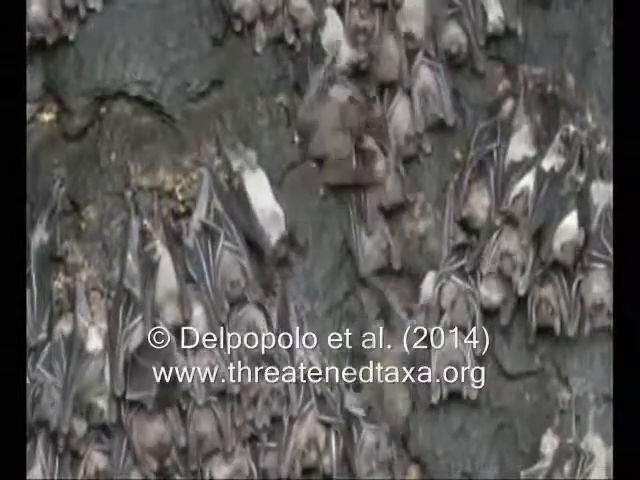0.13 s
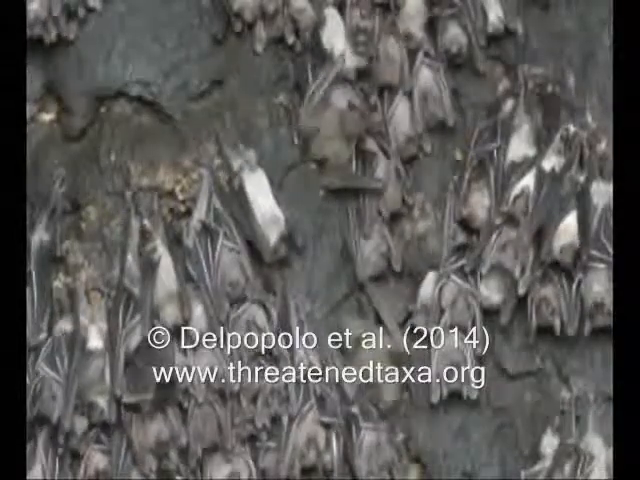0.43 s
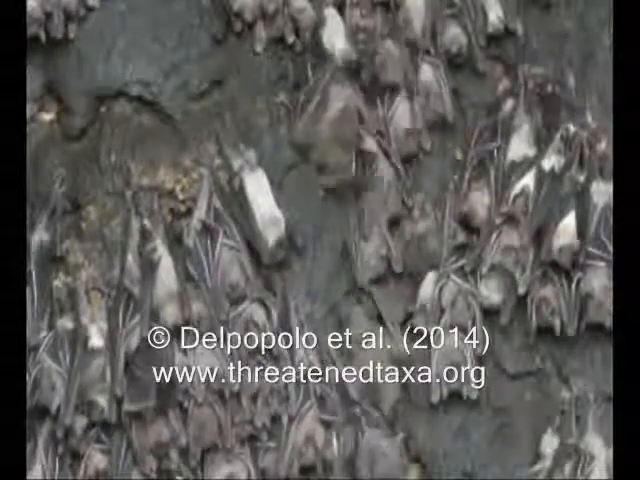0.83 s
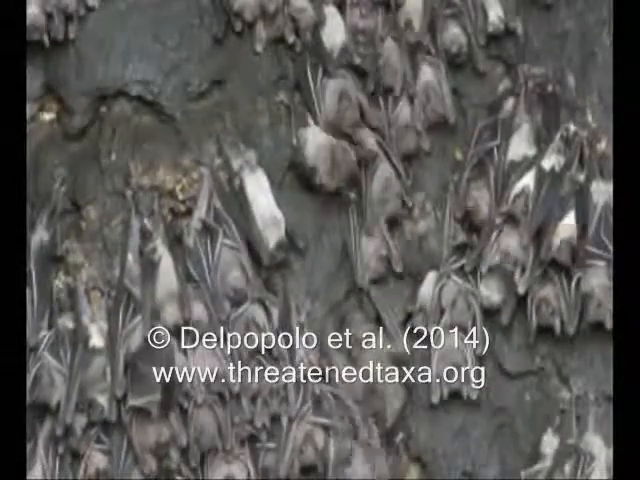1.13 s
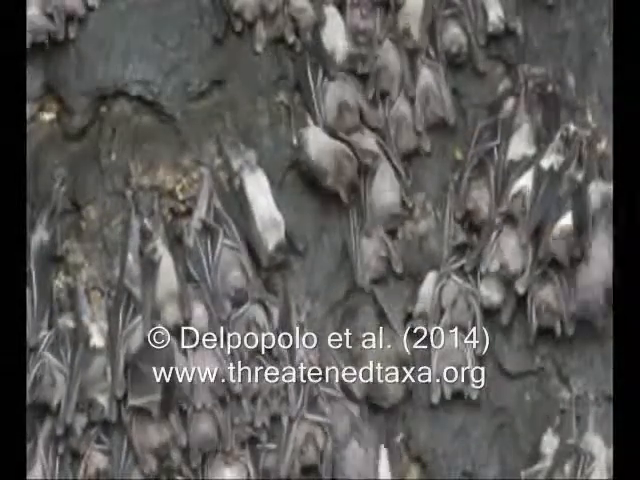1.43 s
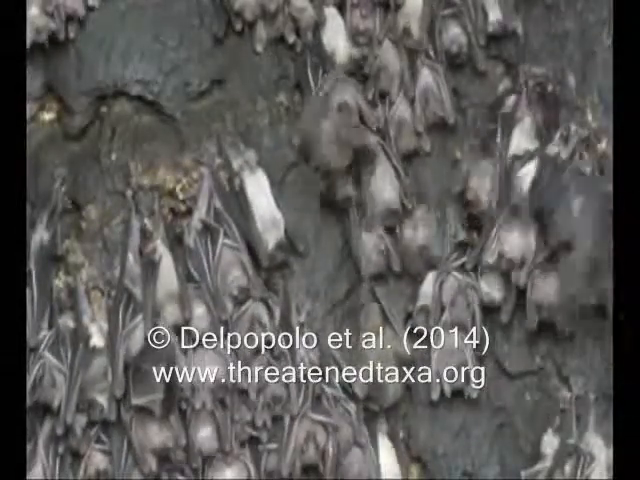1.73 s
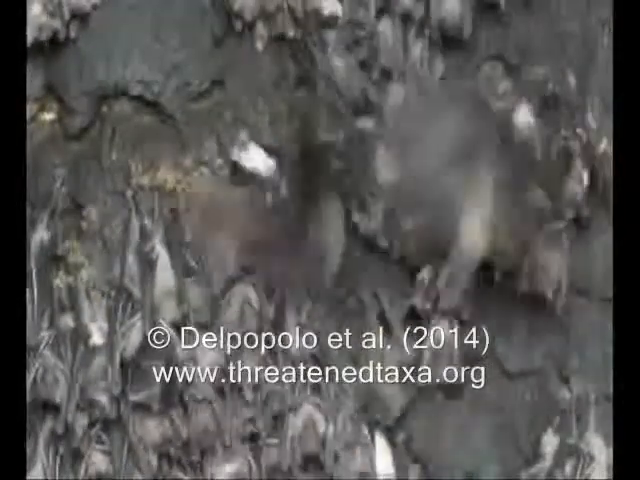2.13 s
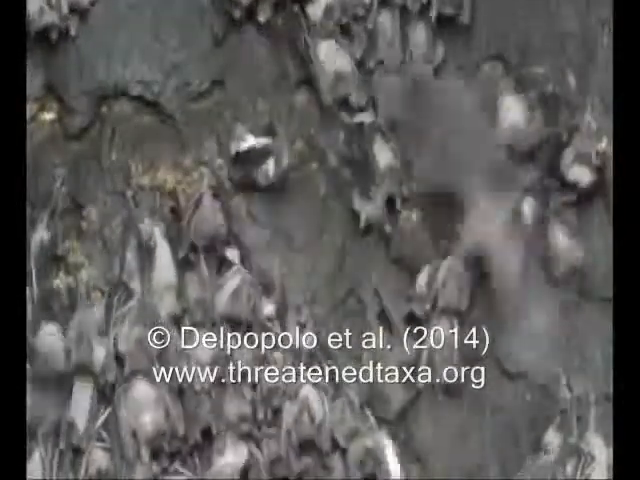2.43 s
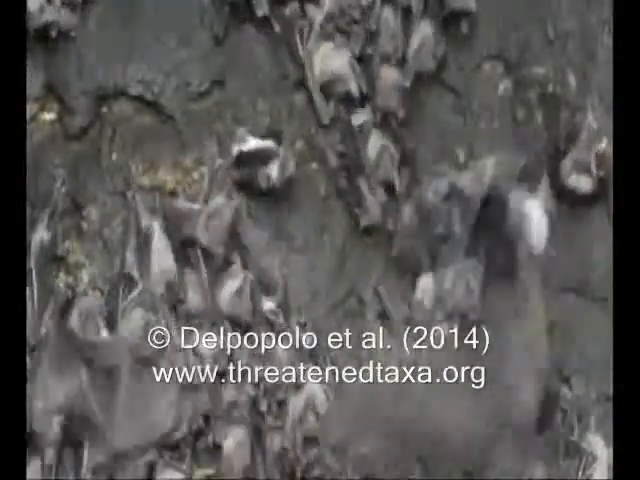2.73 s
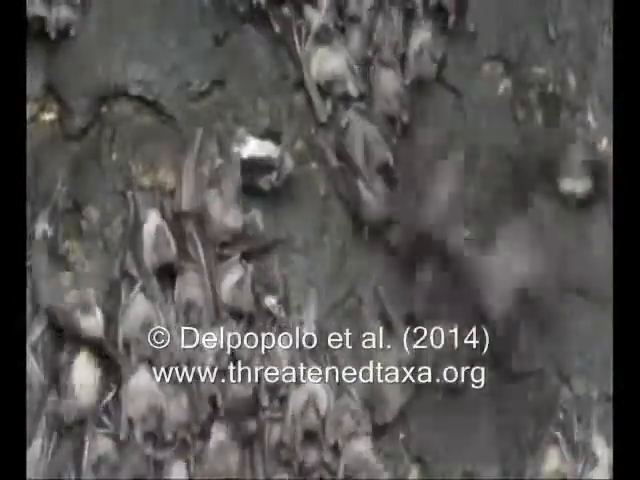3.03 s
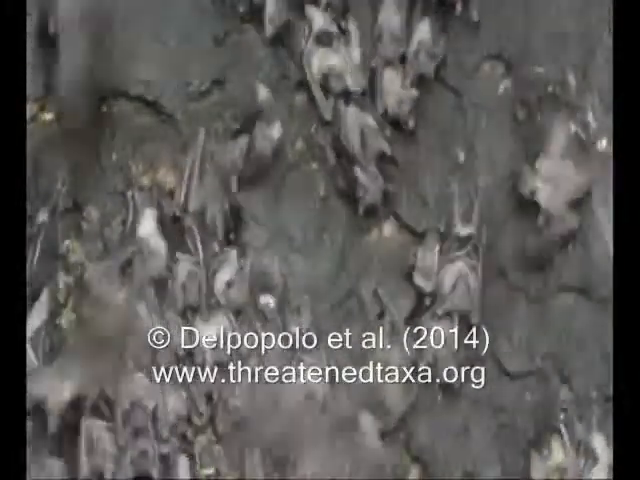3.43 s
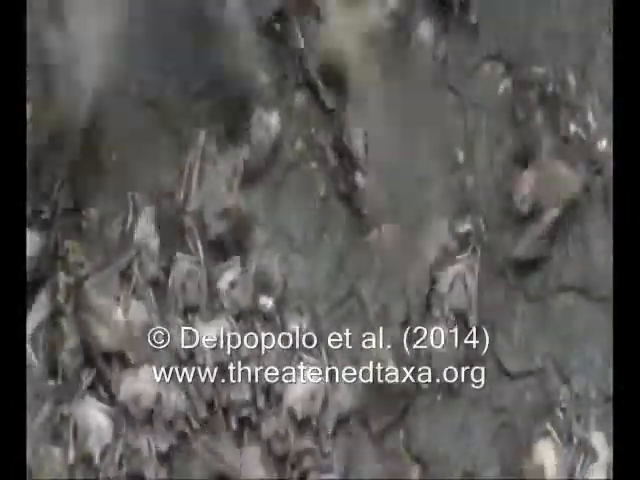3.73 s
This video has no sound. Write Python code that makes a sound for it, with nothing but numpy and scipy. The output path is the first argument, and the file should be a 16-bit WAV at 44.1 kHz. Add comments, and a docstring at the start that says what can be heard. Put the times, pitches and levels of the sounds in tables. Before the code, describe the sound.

A large bat colony chatters throughout about 4 seconds, merging into a dense, bright, fluttering hiss strongest around 5-7 kHz and leaning right. Faint tiny squeaks flicker inside it. From about 0.3 s nearer, brief rasping screeches emerge; from 0.9 s thin gliding squeaks join, clustered until 1.3 s, then scattered almost to the end. Short cave reflections blur them over a faint, sinking hollow rush and low hum.

```python
"""A large colony of fruit bats in a cave, heard mostly on the right: filtered noise and swept tones.
From the start, far calls merge into a bright, surging hiss, with faint random squeaks among them;
a noise rush with a slowly sinking hollow resonance and a hum of wavering tones lie underneath.
Nearer screeches (rasping noise bands) enter after about 0.3 s, thin gliding squeaks (swept sines)
before 0.9 s; both recur almost to the end, smeared like the faint squeaks by reflections off rock."""
import sys
import numpy as np
from scipy import signal
from scipy.fft import rfft, irfft
from scipy.io import wavfile

SR = 44100
rng = np.random.default_rng(int(sys.argv[2]) if len(sys.argv) > 2 else 0)


def dump(signal):
    """Clip the signal to [-1, 1] and save it as 16-bit WAV at the path in sys.argv[1]."""
    limited = np.clip(np.atleast_2d(signal).T, -1, 1)
    pcm = np.round(limited * 32767).astype(np.int16)
    wavfile.write(sys.argv[1], SR, pcm)


N = 171990
TIME = np.arange(N) / SR   # s

# Relative spectral density of the merged far calls: f/Hz, level/dB per Hz
COLONY_SPECTRUM = [(1300, -27), (1470, -22), (1600, -23.5), (1800, -18.5), (2300, -18), (3350, -12.5),
                   (4300, -5), (4900, -0.5), (6100, 1), (7000, 0.46), (8600, -4.5), (10300, -4),
                   (11400, -5), (12300, -8.5)]
# Level curves of the lower and upper voices, used about their means and scaled: t/s, level/dB
LOW_VOICE_LEVEL = [(0.0, -18), (0.15, -20), (1.05, -22), (1.07, -26), (1.12, -21), (1.9, -23),
                   (1.93, -19.5), (2.36, -24.5), (3.08, -17.5), (3.15, -24), (3.31, -18.5), (3.37, -23),
                   (3.48, -23), (3.58, -23), (3.64, -19), (3.73, -23), (3.88, -17.5), (3.9, -27)]
HIGH_VOICE_LEVEL = [(0.0, -19), (0.02, -20.5), (0.57, -20.5), (0.66, -23), (0.75, -17), (0.79, -22),
                    (1.02, -22), (1.1, -24.5), (1.25, -20.5), (1.34, -22.5), (1.53, -19.5), (1.64, -24.5),
                    (1.68, -21), (2.73, -20.5), (2.76, -23), (3.16, -20), (3.2, -21.5), (3.9, -22)]
# Nearer screeches, level before a common trim:
# middle t/s, duration/s, centre f/Hz, bandwidth/Hz, level/dB, left minus right/dB
SCREECH_CALLS = [ (0.372, 0.17, 6860, 1200, -23, -7), (0.551, 0.091, 6950, 1300, -19.5, -9),
                 (0.741, 0.088, 7050, 1700, -29, -8), (0.75, 0.058, 9150, 1300, -28, -4),
                 (0.914, 0.073, 10800, 1500, -24, -17), (1.023, 0.077, 7200, 900, -23, -6),
                 (1.423, 0.062, 9100, 1200, -24, -3), (1.537, 0.044, 10200, 2200, -22, -12),
                 (1.909, 0.1, 10600, 1100, -24, -16), (2.155, 0.067, 8700, 1900, -25, 1),
                 (2.387, .048, 10000, 1100, -26, -12), (2.511, 0.059, 11800, 1000, -21, -17),
                 (2.695, 0.054, 8400, 1500, -23, -5), (2.79, 0.12, 5130, 800, -24.5, -11),
                 (2.96, .16, 5950, 900, -24.5, -7), (3.15, .06, 6200, 1300, -24, -10),
                 (3.255, 0.1, 5200, 700, -22.5, -6), (3.424, 0.052, 5230, 700, -23, -6),
                 (3.624, 0.11, 11900, 1100, -27, -12), (3.629, .11, 6560, 1700, -20, -10),
                 (3.881, .04, 8300, 2200, -17.5, -11)]
# Nearer squeaks, level before taper and common trim:
# start t/s, duration/s, first f/Hz, middle f/Hz, last f/Hz, level/dB, left minus right/dB
SQUEAK_CALLS = [(0.872, 0.023, 9400, 10050, 10400, -20.5, -17), (0.902, .026, 9200, 10000, 10800, -25, -12),
                (0.922, 0.036, 10700, 10000, 8560, -22, -9), (0.93, 0.022, 4450, 4520, 4360, -24, -20),
                (0.952, 0.019, 7630, 7300, 6740, -21.5, -4), (0.988, 0.032, 7300, 7700, 7450, -23, -5),
                (0.999, 0.031, 10500, 11100, 10570, -18.5, -22),
                (1.136, 0.082, 5670, 5950, 6200, -23.5, -8), (1.23, 0.017, 8000, 8300, 8500, -21, -10),
                (1.24, 0.033, 10200, 10150, 10460, -17.5, -14),
                (1.266, 0.046, 10300, 10950, 11130, -21.5, -21),
                (1.374, .022, 11700, 11850, 11600, -24, -18), (1.408, 0.03, 9400, 9100, 8340, -27, -2),
                (1.645, 0.08, 10500, 10650, 10950, -27, -13), (1.71, 0.03, 7270, 7750, 7940, -23, -7),
                (1.717, 0.018, 10900, 10800, 10700, -22, -18),
                (1.758, 0.037, 10300, 10450, 10700, -22, -18),
                (1.902, .03, 11100, 10750, 10000, -23.5, -16), (2.167, 0.044, 7640, 8450, 7900, -22, -5),
                (2.2, .038, 10350, 10400, 10300, -25, -14), (2.262, 0.049, 8300, 8600, 8200, -23.5, -4),
                (2.363, 0.037, 10300, 10500, 10000, -23, -14),
                (2.601, 0.049, 9670, 10650, 10700, -23.5, -16), (3.006, 0.097, 3900, 3980, 3980, -36, -4),
                (3.035, .028, 11400, 11250, 11000, -25, -14), (3.092, 0.018, 9900, 10150, 10100, -24.5, -9),
                (3.128, .03, 9100, 9400, 9500, -25, -2), (3.275, 0.088, 4950, 4870, 4900, -24, -9),
                (3.295, 0.093, 3700, 3700, 3780, -32.5, -6), (3.382, 0.025, 11600, 11650, 11400, -24, -26),
                (3.478, 0.054, 8900, 9050, 8500, -21.5, -8), (3.65, 0.025, 10200, 10150, 9900, -23, -9),
                (3.775, 0.033, 9900, 9900, 8900, -22.5, -5)]
# Relative spectral density of the cave's hollow rush: f/Hz, level/dB per Hz
RUSH_SPECTRUM = [(25, -18), (59, -3.5), (87, -0.5), (130, -4.5), (230, -5.5), (330, -8), (490, -9.5),
                 (620, -5.5), (740, -0.5), (840, 0), (1000, -1.5), (1130, -8), (1270, -11), (1400, -7)]
# Level curve of the rush's hollow resonance, used about its mean: t/s, level/dB
HOLLOW_LEVEL = [(0.0, -44), (0.81, -42.5), (1.52, -44.5), (1.57, -45.5), (3.38, -42), (3.73, -44),
                (3.9, -41.5)]
# Faint hum tones: mean f/Hz, level/dB
HUM_TONES = [(103, -66), (195, -64.5), (271, -68.5)]
# Stereo balance against frequency: f/Hz, left minus right/dB
STEREO_LEAN = [(60, 0.5), (120, 0), (260, -1), (420, -5.5), (750, -5), (1300, -2.5), (2000, -5),
               (3000, -5.5), (4900, -10.5), (7000, -10.5), (8700, -5), (9400, -9.5), (11000, -17.5),
               (11600, -14)]
# Correlation of left and right noise: f/Hz, coefficient (1 = alike)
STEREO_LIKENESS = [(30, 0.65), (70, 0.89), (140, 0.74), (300, 0.26), (800, 0.68), (1400, 0.46),
                   (2800, 0.46), (5500, 0.56), (9000, .68), (12000, 0.68)]

COLONY_DB, VOICE_SPLIT_HZ = -16.5, 5400
SWING = 0.66   # scale on the voice level curves
# spread of each random level (its sign is immaterial) and its rate
SURGE_DB, SURGES_PER_S = 0.4, 12   # the whole colony
PATCH_DB, PATCHES_PER_S = 0.97, 37   # each pitch range on its own
FLUTTER_DB, FLUTTERS_PER_S = -0.3, 360   # each pitch range, faster

SCREECH_TRIM_DB, RASP_DB, RASPS_PER_S = -2, 2.5, 520

SQUEAK_TRIM_DB, SQUEAK_TAPER = -2, 0.3   # taper: exponent of the sine envelope
WAVER, WAVERS_PER_S = 0.0093, 250   # spread of pitch, as a share
TREMBLE_DB, TREMBLES_PER_S = 2.5, 120   # spread of level

CHATTER_PER_S, CHATTER_S = 230, 0.026
CHATTER_DB, CHATTER_SPREAD_DB = -32, 4.5   # before the colony's colour and swing
CHATTER_FOLLOWS = 0.5   # share of the colony's colour taken on
CHATTER_LOW_HZ, CHATTER_HIGH_HZ = 4500, 12070
CHATTER_GLIDE, CHATTER_ARCH = 0.11, 0.0299   # shares of the pitch
CHATTER_PAN_DB = 15   # full range about the colony's lean

RUSH_DB = -42.5
RUSH_SINK = 0.034   # the resonance starts this share above its pitch and ends as far below

CAVE_T60_S, CAVE_DB = 0.34, -6
NEAR_WALLS_S, NEAR_WALLS_DB = 0.03, -9.5   # first reflections; level before treble weighting
CUTOFF_HZ = 12450


def colony(count=16):
    """Superposition: many far calls sum to noise, whose bands surge together and flicker separately."""
    hz, noise = diffuse(COLONY_SPECTRUM)
    noise = noise / np.sqrt(1 + (1300 / (hz + 1)) ** 12)   # remove the bass
    low, high = swing_db(LOW_VOICE_LEVEL), swing_db(HIGH_VOICE_LEVEL)
    surge = SURGE_DB * drift(SURGES_PER_S)
    centres = np.linspace(2000, 12500, count)
    out = 0
    for centre, own in zip(centres, np.eye(count)):
        upper = 1 / (1 + (VOICE_SPLIT_HZ / centre) ** 10)
        calling = 1 / (1 + (3000 / centre) ** 4)   # the lowest bands vary least
        db = SWING * (upper * high + (1 - upper) * low) + surge
        db = db + PATCH_DB * drift(PATCHES_PER_S) + FLUTTER_DB * drift(FLUTTERS_PER_S)
        band = irfft(noise * np.interp(hz, centres, own), N)   # overlapping triangular bands
        out = out + from_db(calling * db) * band
    return from_db(COLONY_DB) * rms_one(out)


def screeches():
    """Source and filter: noise of rapidly varying level excites a resonant band, giving a rasp."""
    out = np.zeros((2, N))
    for middle, length, hz, width, db, side_db in SCREECH_CALLS:
        throat = signal.butter(2, [hz - width / 2, hz + width / 2], "band", fs=SR, output="sos")
        rasp = from_db(RASP_DB * drift(RASPS_PER_S, size=SR // 2))
        voice = rms_one(signal.sosfilt(throat, rng.standard_normal(SR // 2) * rasp))
        size = int(length * SR)
        swell = np.sqrt(np.abs(np.sin(np.linspace(0, np.pi, size))))
        call = voice[:size] * swell * from_db(db + SCREECH_TRIM_DB)
        add(out, middle - length / 2, call * pan(side_db))
    return out


def squeaks():
    """Superposition of separate tonal calls from the nearer bats, each with its own time and place."""
    out = np.zeros((2, N))
    for start, length, *pitches_hz, db, side_db in SQUEAK_CALLS:
        add(out, start, squeak(length, pitches_hz) * from_db(db + SQUEAK_TRIM_DB) * pan(side_db))
    return out


def squeak(length, pitches_hz):
    """Frequency modulation: a sine follows a parabola through three pitches, with random waver."""
    u = np.linspace(0, 1, int(length * SR))
    glide_hz = np.polyval(np.polyfit([0, 0.5, 1], pitches_hz, 2), u)
    hz = glide_hz * (1 + WAVER * drift(WAVERS_PER_S, size=SR // 2)[:len(u)])
    tone = np.sin(2 * np.pi * np.cumsum(hz) / SR) * np.sqrt(2)
    tremble = from_db(TREMBLE_DB * drift(TREMBLES_PER_S, size=SR // 4)[:len(u)])
    taper = np.abs(np.sin(np.pi * u)) ** SQUEAK_TAPER
    return rms_one(tremble) * taper * tone


def chatter():
    """Random superposition: squeaks from deeper in the crowd follow the colony's colour and swing."""
    out = np.zeros((2, N))
    draws = rng.random((int(CHATTER_PER_S * N / SR), 6))
    for when, pitch, length, glide, loud, place in draws:
        hz = CHATTER_LOW_HZ + (CHATTER_HIGH_HZ - CHATTER_LOW_HZ) * pitch
        slope = CHATTER_GLIDE * (glide - 0.5)
        pitches_hz = hz * np.array([1 - slope, 1 + CHATTER_ARCH, 1 + slope])
        call = squeak(CHATTER_S * (0.5 + length), pitches_hz)
        db = CHATTER_DB + CHATTER_SPREAD_DB * (2 * loud - 1)
        db = db + CHATTER_FOLLOWS * at_hz(COLONY_SPECTRUM, hz)
        side_db = at_hz(STEREO_LEAN, hz) + CHATTER_PAN_DB * (place - 0.5)
        add(out, when * N / SR, call * from_db(db) * pan(side_db))
    return out * from_db(SWING * swing_db(HIGH_VOICE_LEVEL))


def cave(x):
    """Reverberation: convolution with exponentially decaying noise, independent in each ear."""
    t = TIME[:SR]
    walls = rng.standard_normal((2, SR)) * from_db(-60 * t / CAVE_T60_S) * (t > 0.006)
    walls /= np.sqrt(np.sum(walls ** 2, axis=1, keepdims=True))
    return x + from_db(CAVE_DB) * signal.fftconvolve(x, walls, axes=1)[:, :N]


def rush():
    """Resonance: steady low noise under a slowly sinking hollow band, plus the hum."""
    hz, noise = diffuse(RUSH_SPECTRUM)
    noise = noise / np.sqrt((1 + (hz / 1350) ** 12) * (1 + (22 / (hz + 1)) ** 6))
    bass = 1 / (1 + (hz / 450) ** 4)

    def shifted(ratio):
        """Resonance scaling: the same noise with its spectral peaks moved by a ratio."""
        change_db = at_hz(RUSH_SPECTRUM, hz / ratio) - at_hz(RUSH_SPECTRUM, hz)
        return irfft(noise * (1 - bass) * from_db(change_db), N)

    early, late = shifted(1 + RUSH_SINK), shifted(1 - RUSH_SINK)
    hollow = early + (late - early) * TIME / TIME[-1]
    air = rms_one(irfft(noise * bass, N) + from_db(swing_db(HOLLOW_LEVEL)) * hollow)
    return from_db(RUSH_DB) * air + hum()


def hum():
    """Frequency modulation: faint sines, each wandering slowly by a few hertz."""
    out = 0
    for line_hz, db in HUM_TONES:
        phase = 2 * np.pi * np.cumsum(line_hz + 3 * drift(5)) / SR
        out = out + from_db(db) * np.sqrt(2) * np.sin(phase)
    return out


def diffuse(spectrum):
    """Diffuse field: partly correlated stereo noise, coloured by near walls; gives f/Hz and spectrum."""
    hz = np.arange(N // 2 + 1) * SR / N
    mid, side = rfft(rng.standard_normal((2, N)))
    alike = np.clip(at_hz(STEREO_LIKENESS, hz), -1, 1)
    both = np.sqrt(1 + alike) * mid + np.sqrt(1 - alike) * side * [[1], [-1]]
    walls = rng.standard_normal((2, int(NEAR_WALLS_S * SR)))
    walls = walls / np.sqrt(walls.shape[1]) * from_db(NEAR_WALLS_DB)
    colour = 1 + rfft(walls, N) * hz / (hz + 700)   # reflections weighted to the treble
    return hz, both * colour * from_db(at_hz(spectrum, hz)) * pan(at_hz(STEREO_LEAN, hz))


def drift(rate, size=N):
    """Low-pass noise: two equal poles at a rate in Hz give a smooth random curve of spread 1."""
    step = 20   # samples between computed points
    r = np.exp(-2 * np.pi * rate * step / SR)
    chance = rng.standard_normal(size // step + 3000)
    slow = signal.lfilter([1], [1, -2 * r, r * r], chance)[2000:]   # drop the settling time
    return np.interp(np.arange(size) / step, np.arange(len(slow)), rms_one(slow))


def swing_db(rows):
    """Relative level: a curve in decibels about its mean over time."""
    db = np.interp(TIME, *np.transpose(rows))
    return db - db.mean()


def at_hz(points, hz):
    """Logarithmic pitch: read a table on a log-frequency axis."""
    table = np.array(points)
    return np.interp(np.log(hz + 1e-9), np.log(table[:, 0]), table[:, 1])


def pan(db):
    """Level difference between the ears: left and right gains of constant total power."""
    gains = from_db(np.array([[0.5], [-0.5]]) * db)
    return gains / np.sqrt(np.mean(gains ** 2, axis=0))


def add(out, start, sound):
    """Linear superposition: mix a stereo sound in at a time in seconds."""
    i = int(np.clip(start * SR, 0, N - 1))
    out[:, i:i + sound.shape[1]] += sound[:, :N - i]


def from_db(db):
    """Decibel definition: level to amplitude ratio."""
    return 10 ** (np.asarray(db) / 20)


def rms_one(x):
    """Effective value: scale to rms 1."""
    return x / np.sqrt(np.mean(x ** 2) + 1e-20)


def scene():
    """Superposition of the colony, the rush and the reverberant calls."""
    calls = cave(screeches() + squeaks())
    return colony() + calls + cave(chatter()) + rush()


def record(dry):
    """Band limiting: a steep elliptic low-pass (0.1 dB ripple, 80 dB rejection) cuts the top."""
    low_pass = signal.ellip(12, 0.1, 80, CUTOFF_HZ, fs=SR, output="sos")
    return signal.sosfilt(low_pass, dry)


dry = scene()
out = record(dry)
dump(out)
```